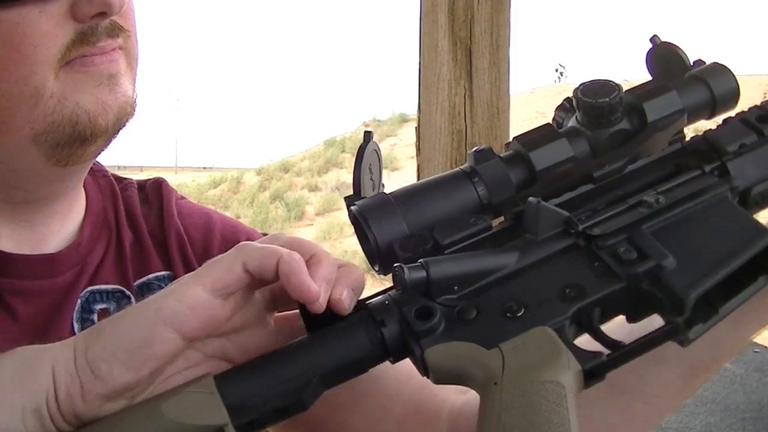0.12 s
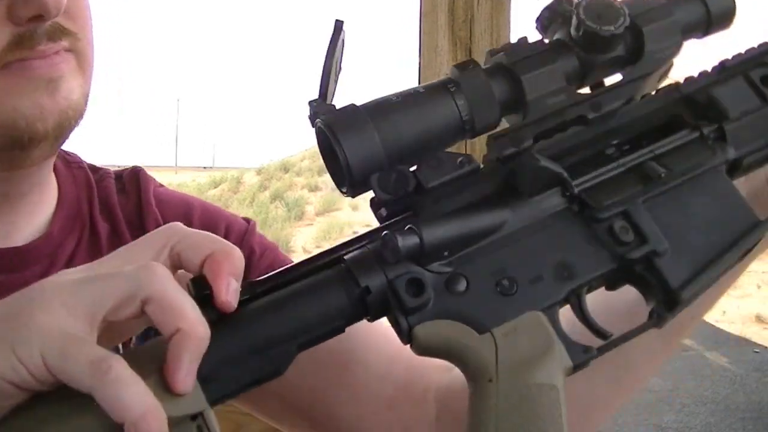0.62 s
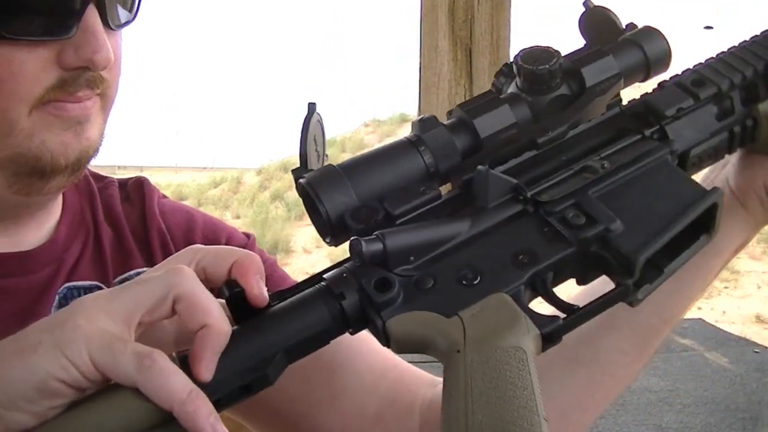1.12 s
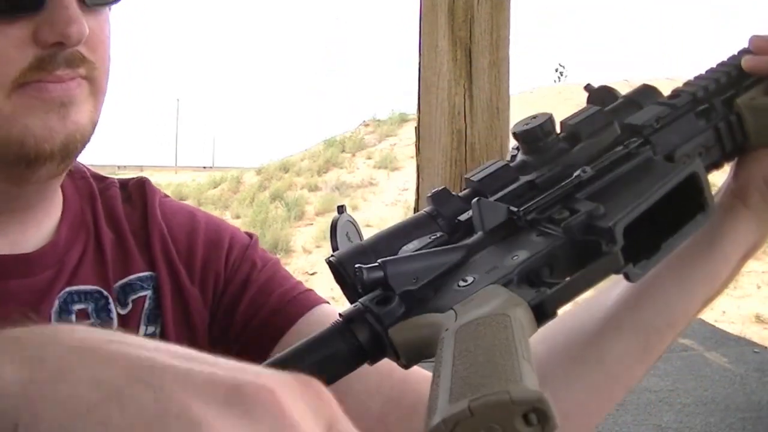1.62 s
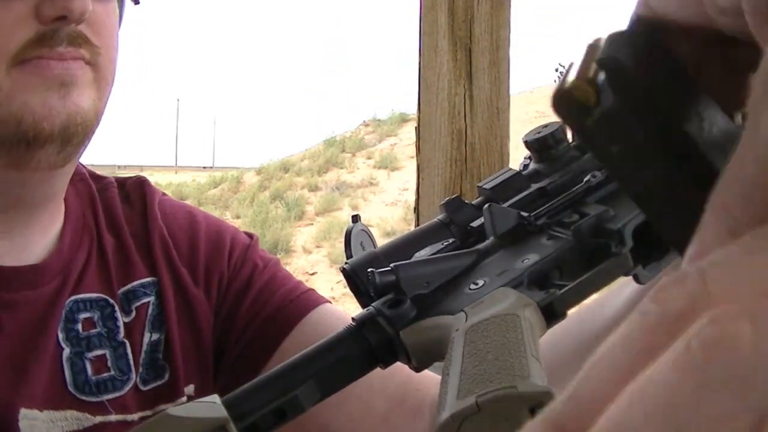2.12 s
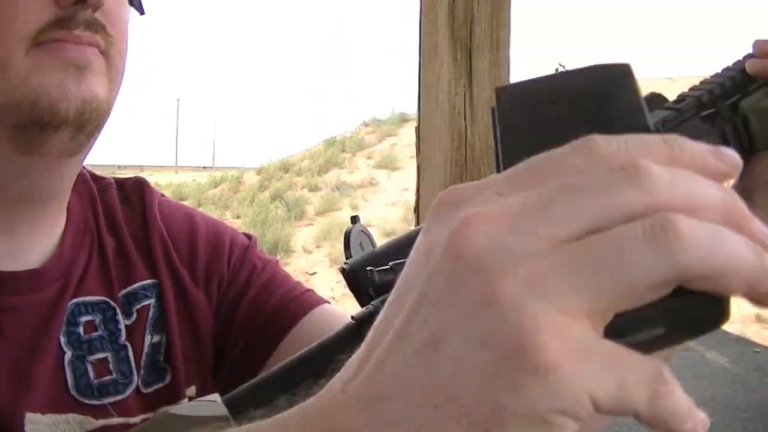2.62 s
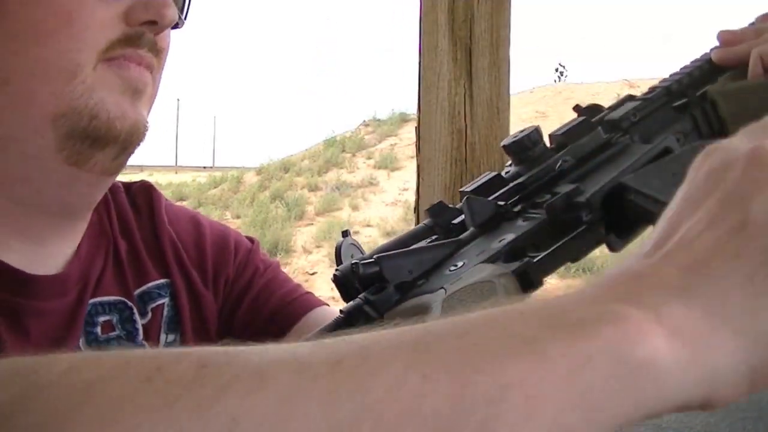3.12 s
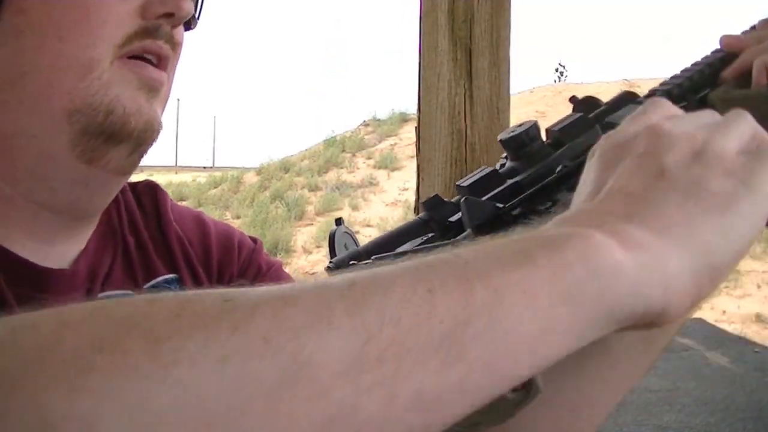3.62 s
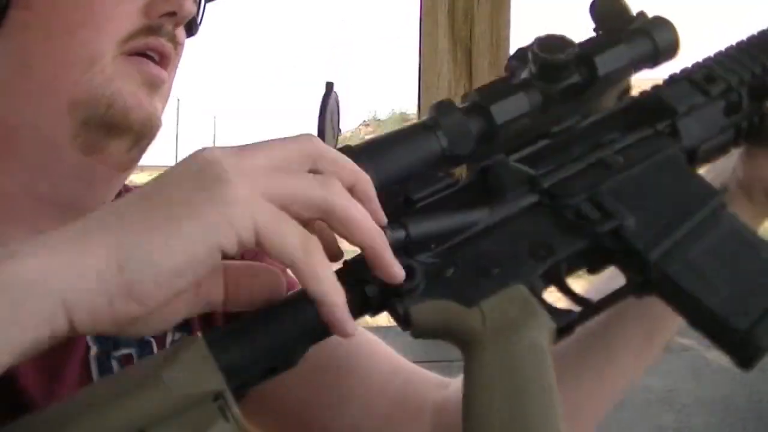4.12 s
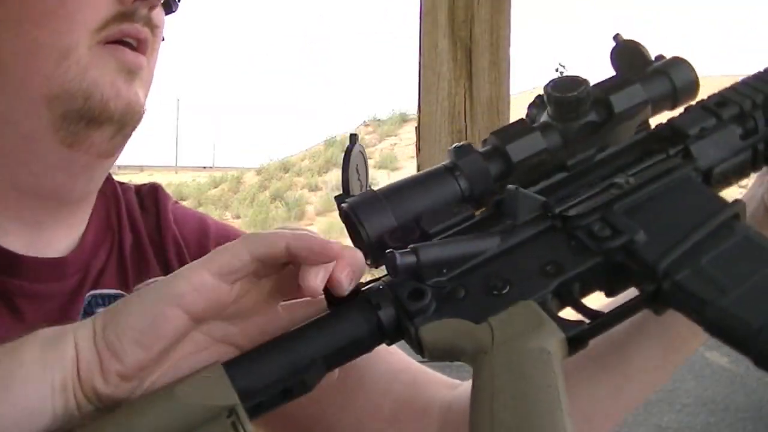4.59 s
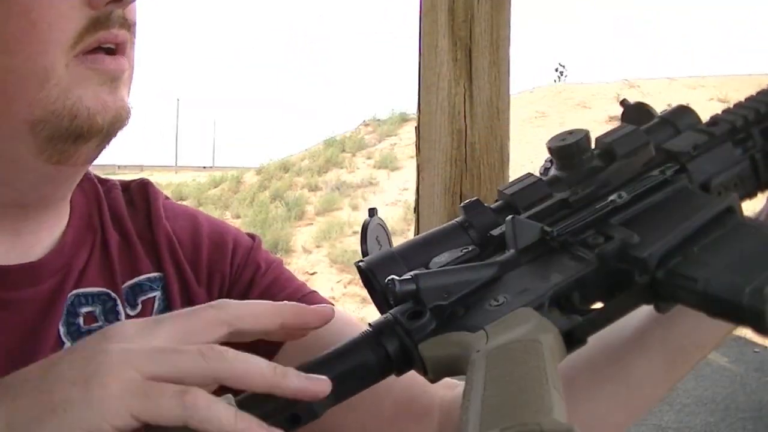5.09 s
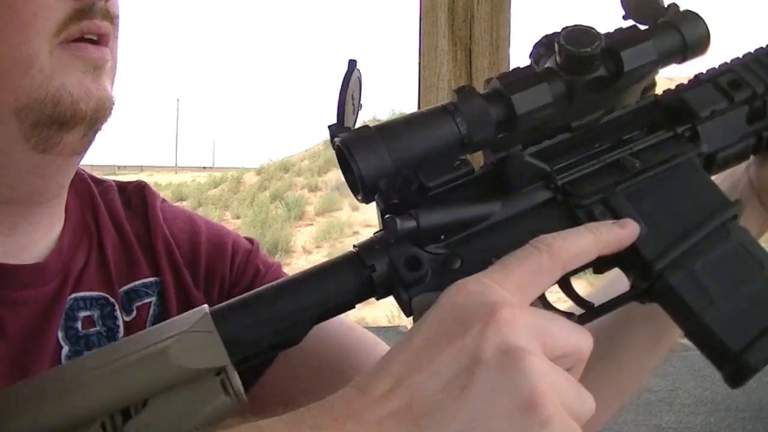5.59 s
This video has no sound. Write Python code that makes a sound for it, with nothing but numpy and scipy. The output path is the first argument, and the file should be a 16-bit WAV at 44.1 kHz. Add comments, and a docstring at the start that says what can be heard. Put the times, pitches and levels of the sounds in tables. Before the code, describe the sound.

Hard, bright metal clacks and spring ticks of a rifle being handled, then hollow plastic knocks and slaps, and a final fast burst of steel clatter.

```python
"""Under an open shelter, close to the microphone, a rifle is handled: hard steel knocks open the take,
the handle is drawn back against its ticking spring, and the bolt slams home.
Then a plastic magazine is seated and slapped, and the action is worked once more.
Knocks are noise bursts ringing the modes of the steel parts or the plastic magazine; slides, hands and the
air at the microphone are shaped noise; scuffs are resonant noise, bumps short low tones, echoes sparse taps."""
import sys
import numpy as np
from scipy import signal
from scipy.fft import rfft, irfft
from scipy.io import wavfile
from scipy.ndimage import uniform_filter1d

SR = 44100
rng = np.random.default_rng(int(sys.argv[2]) if len(sys.argv) > 2 else 0)


def master_out(mix):
    """Clip the mix to full scale and print it as 16-bit PCM to the path in sys.argv[1]."""
    frames = np.transpose(np.atleast_2d(mix))
    ceiling = np.clip(frames, -1, 1)
    pcm = np.round(ceiling * 32767).astype(np.int16)
    wavfile.write(sys.argv[1], SR, pcm)


def volts_from_db(level):
    """Convert decibel levels to linear amplitude ratios."""
    exponent = np.asarray(level, float) / 20
    return 10 ** exponent


N = 252252


def evened(x):
    """Scales to rms 1."""
    return x / np.sqrt(np.mean(x ** 2) + 1e-20)


def read(points, hz):
    """Reads a spectrum on a log-frequency axis."""
    f, value = np.transpose(points)
    return np.interp(np.log(hz + 1), np.log(f + 1), value)


def add(mix, s, sound):
    """Mixes a sound in at a time in seconds."""
    part = mix[round(s * SR):][:len(sound)]
    part += sound[:len(part)]


def causal(gain_db):
    """Minimum-phase response of a gain curve, so that a blow has no pre-ring."""
    cepstrum = irfft(gain_db * np.log(10) / 20)
    cepstrum[1:len(gain_db) - 1] *= 2
    cepstrum[len(gain_db):] = 0
    return np.exp(rfft(cepstrum))


def rings(modes, count):
    """Each mode as a decaying sine, one row per mode."""
    t = np.arange(count) / SR
    hz, db, t60 = np.transpose(modes)[:, :, None]
    return volts_from_db(db - 60 * t / t60) * np.sin(2 * np.pi * hz * t)


def hiss(spectrum, patchy_db, flicker_db):
    """Noise of a spectrum with drifting patches and a flicker shared by all bands."""
    frames, hz = N // 128 + 5, np.fft.rfftfreq(512, 1 / SR)
    real, imaginary, patches = rng.standard_normal((frames, 257, 3)).T
    patches = uniform_filter1d(patches, size=5, axis=0)
    patches = evened(uniform_filter1d(patches, size=14, axis=1))
    flicker = evened(uniform_filter1d(rng.standard_normal(frames), size=4))
    level_db = read(spectrum, hz)[:, None] + patchy_db * patches + flicker_db * flicker
    z = (real + 1j * imaginary) * volts_from_db(level_db)
    return evened(signal.istft(z, nperseg=512, noverlap=384)[1][:N])


# modes of receiver, barrel and spring tube: (frequency [Hz], relative level [dB], t60 [s])
RECEIVER_MODES = [(449.4, 0, 0.032), (810, 4, 0.028), (918, -3, 0.087), (1550, -9.5, 0.071),
                  (1780, -2.5, 0.15), (2300, -3, 0.065), (3640, -7, 0.05)]
# modes of the hollow plastic magazine, which rings instead while it is seated: same columns
MAGAZINE_MODES = [(482, 12, 0.045), (706, 3, .07), (1005, 0, 0.057), (1330, -10.5, 0.045),
                  (1675, -3.5, .035), (2180, -4.5, .04), (4330, -7, .03)]
# when the magazine is being seated: (start [s], end [s])
SEATING_SPAN = (2.5, 3.9)
# modes of the handle, ringing freely once drawn clear of the receiver: same columns as the receiver
HANDLE_MODES = [(640, -10.5, .04), (965, -2, 0.18), (1750, -6, .24), (2406, -3, .07), (3080, -4.5, 0.091),
                (4082, 3, .05), (4713, -5.5, .12)]
# when the handle is clear: (start [s], end [s])
DRAWN_SPAN = (0.55, 0.65)


def struck_part(s):
    """Modes of whichever part rings at this time: receiver, handle or hollow plastic magazine."""
    if SEATING_SPAN[0] < s < SEATING_SPAN[1]:
        return rings(MAGAZINE_MODES, count=8192)
    if DRAWN_SPAN[0] < s < DRAWN_SPAN[1]:
        return rings(HANDLE_MODES, count=8192)
    return rings(RECEIVER_MODES, count=8192)


def strike(rows, strong_db, strong_octaves, chatter_db, ring_db=-52, spot_db=3):
    """A brief crush and a dying chatter ring the modes; the spot struck sets the colour."""
    out, t, hz = np.zeros(N), np.arange(8192) / SR, np.fft.rfftfreq(8192, 1 / SR)
    grits = rng.standard_normal((len(rows), 8192))
    spots = rng.standard_normal((len(rows), len(RECEIVER_MODES)))
    for (s, peak_db, ring_hz, body_db, edge_db), grit, spot in zip(rows, grits, spots):
        # hollow parts and hard blows rattle longer
        t60 = np.clip(0.043 * volts_from_db(0.36 * (min(body_db, 12) + 9.0) + 0.15 * peak_db), 0.01, 0.12)
        crush = (t / 0.00083) * np.exp(1 - t / 0.00061)
        chatter = volts_from_db(chatter_db - 60 * t / t60) * np.minimum(t / 0.00035, 1)
        drive = grit * (crush + chatter)
        mode_gain = volts_from_db(ring_db + 0.095 * peak_db + spot_db * spot)
        ringing = 1 + rfft(mode_gain @ struck_part(s))
        # the 1.8 kHz clack grows with hollowness and shrinks as the ring climbs
        clack_db = 7 + 0.081 * body_db - 2 * np.log2(ring_hz / 2000)
        colour = [(60, body_db - 42), (350, body_db - 14.5), (750, body_db), (1800, clack_db), (3500, 0.002),
                  (6500, edge_db), (11000, edge_db - 10.0), (16000, edge_db - 18.0)]
        octaves_off = np.log2((hz + 1) / ring_hz)
        strong = strong_db * np.exp(-0.5 * (octaves_off / strong_octaves) ** 2)
        sound = irfft(rfft(drive) * ringing * causal(read(colour, hz) + strong))
        loudest = np.sqrt(2 * uniform_filter1d(sound ** 2, size=30).max())
        add(out, s, volts_from_db(peak_db) * sound / loudest)
    return out


# every knock: (time [s], peak level [dB], strongest ring [Hz], hollow body [dB], bright edge [dB]);
# body and edge are against 3.5 kHz, before the ring is raised
KNOCK_EVENTS = [(0.0909, -3, 6400, -6.5, 6), (0.0983, -3.5, 2920, -10, 2.5), (0.1085, -3.5, 6200, -4, 7),
                (0.1157, -17.5, 5640, -8.5, 9), (0.1387, -31, 1500, -4.5, -9), (0.1557, -28, 1550, -18, 1),
                (0.1861, -17.5, 1490, -22, -0.5), (0.3918, -15, 1610, 7, -6.5), (0.6031, -4, 948, -4.5, 3),
                (0.7216, -44.5, 610, 35, -12), (0.7354, -43, 907, 28, -18), (0.7945, -37.5, 650, 33, -12.5),
                (1.3949, -6, 5100, -10, 1), (1.4106, -6.5, 5040, -11.5, 3.5),
                (1.4204, -6.5, 5150, -8.5, 6.5), (1.4291, -1, 3990, -16, -2),
                (1.4325, 3.5, 6390, -10.5, -3.5), (1.7308, -47.5, 1777, -3, -21.5),
                (2.0308, -47.5, 2330, -13, -7), (2.6441, -20.5, 3350, -16, -9.5),
                (2.662, -26, 1690, -2, -4.5), (2.7063, -34.5, 6100, -1.5, -1),
                (2.802, -32.5, 4640, -7, -4.5), (2.8967, -34, 1890, -3.5, -14.5),
                (3.0667, -5.5, 505.5, 10.5, -1.5), (3.078, -6.5, 2260, 0, -4.5),
                (3.2503, -1.5, 2180, 5.5, -6.5), (3.2773, -6.5, 707, 14.5, -1),
                (3.2829, -9.5, 710, -3.5, -7.5), (3.3388, -28.5, 2360, 11, -30.5),
                (3.3804, -26.5, 1330, 21, -2), (3.4193, -29, 1450, 8.5, -3), (3.4633, -1.5, 2030, 1, -11),
                (3.5774, -20.5, 1440, 11, -8.5), (3.6134, -7, 3550, -8.5, -5),
                (3.6459, 0.5, 1770, -4.5, -6.5), (3.6561, -8.5, 1910, -3.5, 5), (3.8213, -40, 584, 17, -3),
                (4.4798, -19.5, 1660, -19.5, -13.5), (4.5004, -14.5, 3450, -6.5, -2.5),
                (4.5241, -30, 1720, -4, 1.5), (4.5809, -25.5, 1750, -4.5, -11.5),
                (4.5941, 1.5, 6200, -8.5, 4), (4.6166, -19.5, 2900, -17, -9.5),
                (4.647, -17.5, 2420, -19, -8), (4.6922, -16.5, 1550, -12, 3),
                (4.7511, -20.5, 7140, -10.5, 25.5), (4.7603, -9, 1940, -6, -2.5),
                (4.7663, -2.5, 1610, -3.5, 3.5), (4.7989, -19.5, 1690, 2.5, -6),
                (4.8413, -32, 2640, -2.5, -13), (5.0011, -34.5, 6800, -9.5, 1.5),
                (5.0333, -8, 1560, 2.5, 0), (5.0457, -8.5, 1610, -11, -9), (5.0576, -5, 2300, -6.5, -7.5),
                (5.077, -2, 5470, -6, 3.5), (5.0821, -4, 2422, -12.5, 3), (5.6492, -49.5, 2432, 1.5, -2),
                (5.6944, -52.5, 2037, -2, 0)]


def knocks():
    """Knocks of steel parts and the plastic magazine, and a few soft fingertip taps, each ring raised a little."""
    return strike(KNOCK_EVENTS, strong_db=7.5, strong_octaves=0.12, chatter_db=-9.5)


# coils of the spring catching as the handle is drawn: (time [s], peak level [dB])
SPRING_TICKS = [(0.2179, -27), (0.248, -23), (0.2771, -24), (0.2861, -24.5), (0.3047, -30), (0.3474, -21.5),
                (0.3738, -27.5), (0.418, -15), (0.4458, -17.5)]
# colour of every tick: (strongest ring [Hz], hollow body [dB], bright edge [dB])
SPRING_COLOUR = (3935, -16, 0)


def spring_ticks():
    """Catching coils, struck like knocks but with one ring standing far out."""
    rows = [(s, db, *SPRING_COLOUR) for s, db in SPRING_TICKS]
    return strike(rows, strong_db=22.0, strong_octaves=0.12, chatter_db=-4)


# parts sliding or still rattling after a blow: (time [s], length [s], rasp level at start [dB],
# rasp level at end [dB], rustle level against the rasp [dB])
SLIDE_EVENTS = [(0.047, .05, -53, -59, -1), (0.121, 0.056, -40, -55, -11), (0.231, 0.18, -59, -39, -11),
                (0.388, 0.076, -52, -57, 2), (0.52, 0.06, -73, -65.5, -5.5), (0.629, 0.028, -60, -72, 17),
                (0.831, 0.062, -58, -45, -5), (0.918, 0.034, -61, -57, -2), (1.122, 0.018, -67, -57.5, 4.5),
                (1.203, 0.022, -58, -58.5, 2), (1.367, 0.046, -31.5, -15.5, -16),
                (1.438, .14, -36.5, -49.5, -18.5), (2.317, 0.053, -55.5, -67, -9),
                (2.431, 0.081, -51, -50, -9), (2.556, .07, -48, -46, -3), (3.095, .08, -40, -61.5, 6.5),
                (3.275, 0.079, -52, -62.5, 16), (3.426, .035, -57.5, -44, 0),
                (3.587, 0.076, -42, -34, -0.5), (3.633, 0.09, -28.5, -54.5, 3),
                (4.288, 0.17, -65, -51.5, -9.5), (4.594, 0.14, -43, -35.5, -7.5),
                (4.763, 0.062, -34.5, -51.5, -1.5), (5.008, 0.036, -54.5, -24.5, -4.5),
                (5.051, 0.037, -27.5, -23, -10), (5.113, 0.13, -37, -48, -17.5)]
# hands and cloth moving: (time [s], rustle level [dB])
HAND_LEVELS = [(0, -58.5), (0.1, -56.5), (0.2, -70.5), (0.75, -69), (1.02, -61), (1.33, -50), (1.45, -56),
               (1.57, -68.5), (1.75, -67.5), (1.9, -69.5), (2.05, -67), (2.36, -67), (2.5, -49.5),
               (2.9, -52.5), (3.22, -51.5), (3.56, -52.5), (3.88, -65), (4.15, -62.5), (4.42, -52),
               (4.8, -50), (4.98, -72), (5.3, -75.5), (5.72, -72.5)]


def movement(t):
    """Gains of rasp and rustle: the hands throughout, and each slide as a ramp with a quick start and stop."""
    hands_db = np.interp(t, *np.transpose(HAND_LEVELS))
    # skin on steel rasps at -68 dB under a rustle of -62 dB, and grows 0.7 dB per dB
    skin_db = -68 + 0.7 * (hands_db + 62)
    rasp_power, rustle_power = volts_from_db(skin_db) ** 2, volts_from_db(hands_db) ** 2
    start_db_per_s, stop_db_per_s = 898, 502.5
    for s, length, start_db, end_db, rustle_db in SLIDE_EVENTS:
        ramp_db = np.interp(t, [s, s + length], [start_db, end_db])
        ramp_db -= start_db_per_s * np.maximum(s - t, 0)
        ramp_db -= stop_db_per_s * np.maximum(t - s - length, 0)
        rasp_power = rasp_power + volts_from_db(ramp_db) ** 2
        rustle_power = rustle_power + volts_from_db(ramp_db + rustle_db) ** 2
    return np.sqrt(rasp_power), np.sqrt(rustle_power)


# spectrum of sliding parts: (frequency [Hz], relative level [dB per Hz])
RASP_SPECTRUM = [(1200, -30), (2000, -5.5), (3000, -1.5), (3800, -2), (4600, -0.5), (5500, 1), (7000, -1),
                 (8500, -7), (12000, -20), (16000, -27.5)]


def sliding_rasp(grains, stick_slip, snag_db=-13):
    """Sliding parts: gritty noise, with burrs that snag as tiny ticks."""
    rasp = evened(hiss(RASP_SPECTRUM, patchy_db=3.5, flicker_db=1.67) * stick_slip)
    t = np.arange(400) / SR
    scratch = uniform_filter1d(rng.standard_normal(400), size=4) * volts_from_db(-60 * t / 0.008)
    burr = scratch + volts_from_db(-12) * rings(RECEIVER_MODES, count=400)[3:].sum(0)
    return rasp + volts_from_db(snag_db) * evened(signal.oaconvolve(grains, burr)[:N])


# spectrum of hands and cloth: (frequency [Hz], relative level [dB per Hz])
RUSTLE_SPECTRUM = [(200, -28.5), (500, 1), (1000, 4), (1700, 3), (2600, -1), (4000, -5), (8000, -24)]


def hand_rustle(stick_slip, ring_db=-56):
    """Hands and cloth: noise that also sounds through the rifle's modes."""
    rustle = hiss(RUSTLE_SPECTRUM, patchy_db=3.37, flicker_db=0.57) * stick_slip
    rifle = rings(RECEIVER_MODES, count=4096).sum(0)
    return evened(rustle + volts_from_db(ring_db) * signal.oaconvolve(rustle, rifle)[:N])


def handling(grains_per_s=400, grain_db=4.5, gritty=0.087):
    """Rasp and rustle share random grains of stick and slip, and follow the movement."""
    rasp_gain, rustle_gain = movement(np.arange(N) / SR)
    draw = rng.random((N, 2))
    grains = (draw[:, 0] < grains_per_s / SR) * volts_from_db(-grain_db * np.log(draw[:, 1] + 0.0064))
    stick_slip = 1 - gritty + gritty * evened(uniform_filter1d(grains, size=90))
    return rasp_gain * sliding_rasp(grains, stick_slip) + rustle_gain * hand_rustle(stick_slip)


# rubbing that sings in one hollow part: (time [s], length [s], start level [dB], end level [dB], ring [Hz])
SCUFF_EVENTS = [(1.672, 0.21, -66, -72, 1755), (2.307, 0.16, -39, -75, 1240),
                (2.404, 0.088, -48.5, -50.5, 1634), (2.436, 0.065, -52, -52, 853)]


def scuffs(width_hz=80):
    """Friction noise narrowed by a single resonance."""
    out, radius = np.zeros(N), np.exp(-np.pi * width_hz / SR)
    rub = rng.standard_normal((len(SCUFF_EVENTS), SR // 2))
    for (s, length, start_db, end_db, hz), noise in zip(SCUFF_EVENTS, rub):
        poles = [1, -2 * radius * np.cos(2 * np.pi * hz / SR), radius * radius]
        count = int(length * SR)
        sung = evened(signal.lfilter([1, 0, -1], poles, noise))[:count]
        fade = volts_from_db(np.linspace(start_db, end_db, count)) * signal.windows.tukey(count, 0.06)
        add(out, s, sung * fade)
    return out


# soft bumps of the hands and stock: (time [s], peak level [dB], frequency [Hz])
BUMP_EVENTS = [(0.725, -45, 290), (0.783, -49, 295), (1.069, -48.5, 168), (1.132, -44, 160),
               (1.32, -45, 156), (1.697, -50, 146), (1.737, -53.5, 210), (2.02, -57, 154.4),
               (2.13, -60.5, 94.2), (2.585, -36.5, 149), (2.803, -31, 160), (2.857, -28.5, 178),
               (3.372, -43, 127), (4.453, -37.5, 190)]


def bumps(cycles=1.4):
    """Flesh on the stock: a few soft low cycles."""
    out, t = np.zeros(N), np.arange(4410) / SR
    for s, peak_db, hz in BUMP_EVENTS:
        u = t * hz / cycles * 4
        add(out, s, volts_from_db(peak_db) * u * np.exp(1 - u) * np.sin(2 * np.pi * hz * t))
    return out


# how long the shelter's echoes last: (frequency [Hz], t60 [s])
SHELTER_DECAY = [(300, 0.069), (3000, 0.26), (15000, .08)]


def shelter(x):
    """Roof, bench and posts return sparse echoes, decaying at a rate set by frequency."""
    at = np.arange(130, SR // 2 - 20, 20)
    taps = np.zeros(SR // 2)
    taps[at + rng.integers(0, 20, len(at))] = rng.choice([-1., 1.], len(at))
    hz, t, z = signal.stft(taps, SR, nperseg=128)
    t60 = np.clip(read(SHELTER_DECAY, hz), 0.02, 1)[:, None]
    tail = signal.istft(z * volts_from_db(-60 * t / t60), SR, nperseg=128)[1]
    return signal.oaconvolve(x, tail / np.linalg.norm(tail))[:N]


# spectrum of air at the microphone: (frequency [Hz], relative level [dB per Hz])
AIR_SPECTRUM = [(25, -18.5), (70, -5), (150, 0.5), (300, -0.5), (600, -21.5)]
# low stir at the microphone: (time [s], level [dB])
AIR_LEVELS = [(0, -67), (0.4, -93), (0.7, -69.5), (1.36, -58), (1.6, -92.5), (1.72, -68.5), (1.9, -75),
              (2.3, -73), (2.65, -64), (2.85, -52.5), (3, -64), (3.6, -71.5), (4.1, -72), (4.37, -58),
              (4.85, -79), (5.25, -90), (5.72, -78.5)]


def air():
    """Light air stirring the microphone: low patchy noise that swells and sinks."""
    stir = hiss(AIR_SPECTRUM, patchy_db=4.0, flicker_db=2.0)
    return volts_from_db(np.interp(np.arange(N) / SR, *np.transpose(AIR_LEVELS))) * stir


def overload(x, knee=0.85, lopsided=0.3):
    """Peaks are cut at full scale, and past a knee the input is pushed to one side, which thumps."""
    over = np.maximum(abs(x) - knee, 0)
    return np.clip(x, -1, 1) - lopsided * uniform_filter1d(over, size=40)


def scene():
    """Knocks and ticks with their echoes over the handling noise and the air."""
    blows = knocks() + spring_ticks()
    echoes = volts_from_db(-25) * shelter(blows)
    return (blows + echoes + handling() + scuffs() + bumps() + air())[None]


def band_limit(x):
    """A steep low-pass at the top of the band."""
    return signal.sosfilt(signal.butter(12, 16720, fs=SR, output="sos"), x)


def record(dry, cut_hz=90, edge_hz=16100):
    """The microphone chain: bass cut, overload on the hardest blows, band limit."""
    bass_cut = signal.butter(2, cut_hz, "high", fs=SR, output="sos")
    thin = signal.sosfilt(bass_cut, dry)
    band = signal.firwin(255, edge_hz, window=("kaiser", 9), fs=SR)[None]
    limited = signal.oaconvolve(overload(thin), band, "same")
    return band_limit(np.clip(limited, -1, 1))


dry = scene()
out = record(dry)
master_out(out)
```